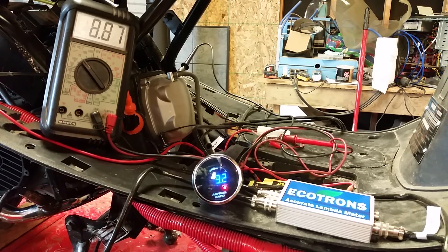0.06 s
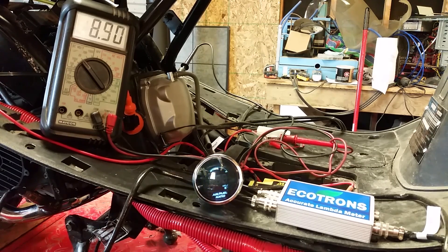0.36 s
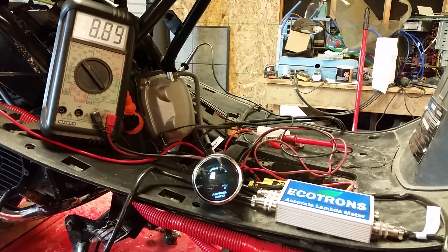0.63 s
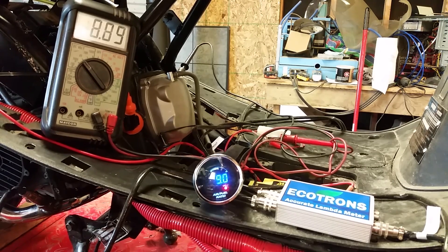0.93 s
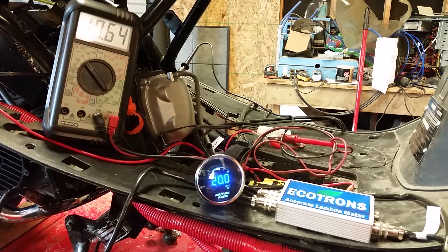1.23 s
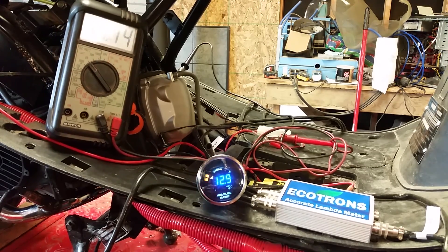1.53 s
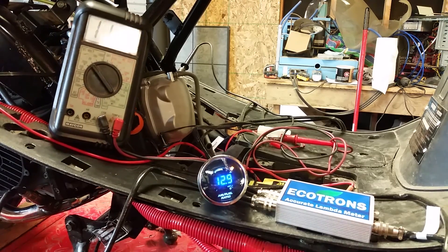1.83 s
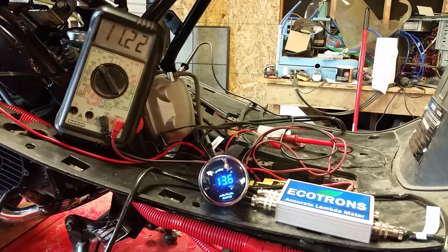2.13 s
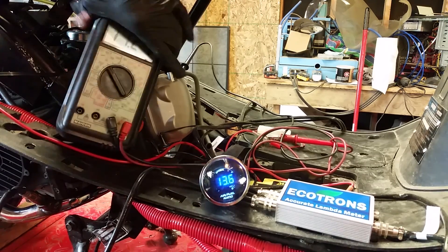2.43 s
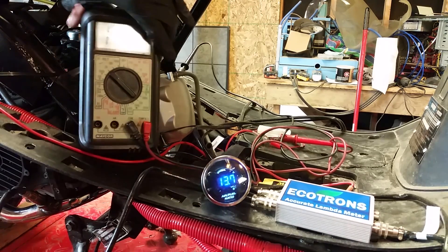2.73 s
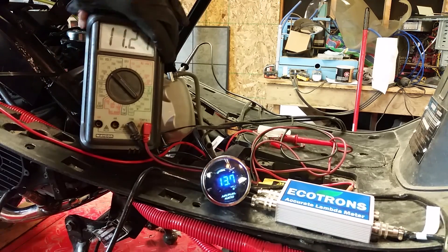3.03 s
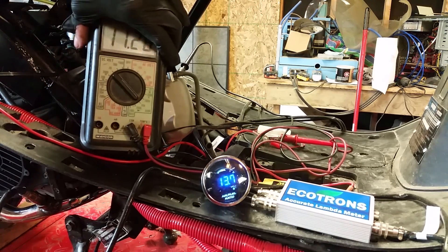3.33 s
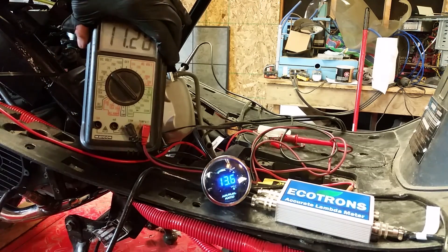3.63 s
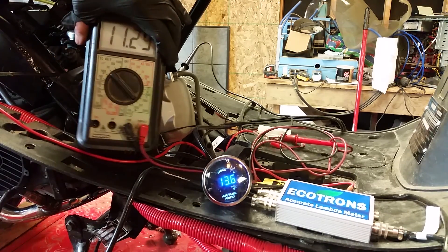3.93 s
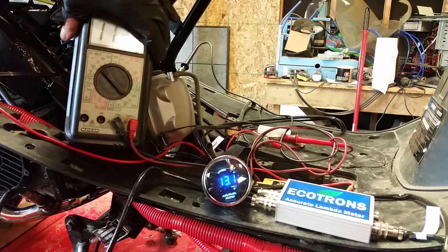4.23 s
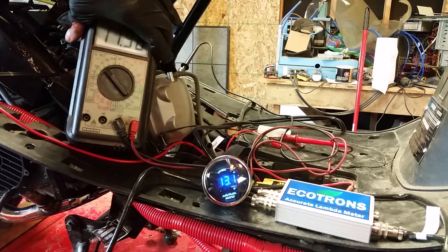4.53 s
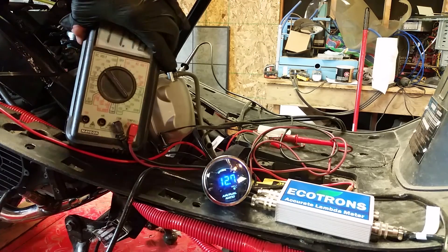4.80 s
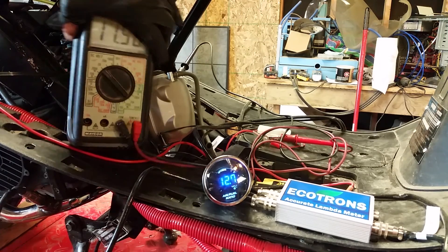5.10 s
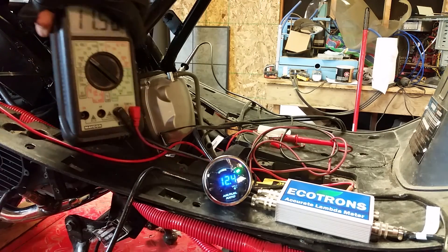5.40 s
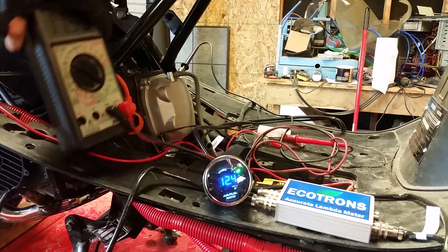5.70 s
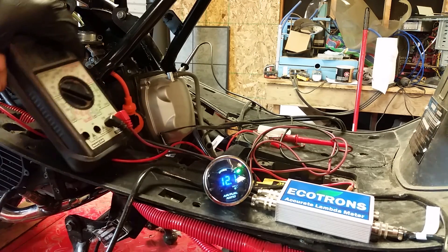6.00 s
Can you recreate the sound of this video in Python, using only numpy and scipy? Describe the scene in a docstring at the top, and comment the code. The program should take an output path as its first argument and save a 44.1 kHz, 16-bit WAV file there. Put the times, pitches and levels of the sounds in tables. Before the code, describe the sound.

From the very start, a scooter's electric starter grinds and whines, labouring through four quick compressions. Each brings a low chuff from the exhaust pipe and a metallic clack. At about 0.75 seconds the single-cylinder four-stroke engine catches with a low boom, and the starter dies away. A few rough, uneven barks follow until about 1 second. The engine then settles into a fast, throbbing idle: low exhaust and intake pulses, with a light knock and bright valve ticking in every cycle. The speed wavers slightly and creeps upward, with occasional harder beats, mostly between 1.6 and 3.1 seconds. A faint hum grows as the speed rises, and the engine is still running at the end, around 6 seconds. The sound is close, heard from just above the scooter's floorboard, in a workshop with short reverberation and a faint low rumble.

```python
"""A single-cylinder four-stroke scooter starts in a workshop, heard from just above its floorboard.
First the electric starter grinds and whines over four compressions, the pipe chuffing and the clutch
clacking at each. At 0.75 s the engine catches, and its first burns boom and rasp. It then settles into
a slowly rising idle: in every cycle the crankcase knocks, an exhaust pulse rings the silencer, the valve
train ticks and the intake gulps from the airbox, over a faint hum and the room's reverberation."""
import sys
import numpy as np
from scipy import signal
from scipy.fft import rfft, irfft, next_fast_len
from scipy.io import wavfile
from scipy.ndimage import uniform_filter1d, map_coordinates

SR = 44100
rng = np.random.default_rng(int(sys.argv[2]) if len(sys.argv) > 2 else 0)


def write(x):
    x = np.atleast_2d(x).T
    wavfile.write(sys.argv[1], SR, np.round(np.clip(x, -1, 1) * 32767).astype(np.int16))


N = 267246
CATCH_S, SETTLE_S = .749, .16


# Engine speed, hunting as it creeps up. Each row: time in seconds, firings per second.
SPEED = [(0.749, 13.86), (0.9, 15.739), (1.43, 16.904), (1.79, 16.101), (2.31, 17.04), (2.43, 15.964),
         (2.55, 16.897), (3.06, 16.477), (3.46, 17.832), (3.58, 17.457), (3.96, 17.639), (4.9, 19.287),
         (5.07, 17.851), (5.49, 19.601), (5.77, 19.734), (5.89, 18.97)]
def cycle_times(phase):
    """Phase is the integral of rate: the times at which the engine passes this fraction of its cycle."""
    t = clock()
    cycles = np.cumsum(curves(SPEED, t)[0]) / SR
    cycles -= np.interp(CATCH_S, t, cycles)
    return np.interp(np.arange(int(cycles[-1]) + 1) + phase, cycles, t)


# Silencer modes, and a higher barking one. Each row: frequency in Hz, width in Hz, gain in dB, polarity.
EXHAUST_MODES = [(138.44, 12, -1.5, -1), (145.6, 13, 1, 1), (190.3, 10.2, -10.5, -1),
                 (208.2, 7.2, -18.5, 1), (259.5, 25, -20.5, -1), (292, 8.5, -18.5, -1),
                 (342, 9.1, -24.5, -1), (373.4, 14, -25.5, -1), (423, 9.9, -44.5, -1)]
BARK_MODES = [(426, 36, -22, -1)]
def exhaust(phase=.054, bark_db_per_hz=5):
    """Impulse excitation: each exhaust pulse rings the silencer, which barks more as the speed rises."""
    times = cycle_times(phase)
    speed, = curves(SPEED, times)
    puffs = pulses(times, amp(.4 * rng.standard_normal(len(times))))
    barks = pulses(times, amp(bark_db_per_hz * (speed - speed.max())))
    return resonate(puffs, EXHAUST_MODES) + resonate(barks, BARK_MODES)


# Airbox modes. Each row: frequency in Hz, width in Hz, gain in dB, polarity.
AIRBOX_MODES = [(56, 26, -31, -1), (86, 37, -20.5, -1), (103.8, 10.5, -9.5, -1), (114.5, 11, -16.5, 1),
                (143.7, 26, -12.5, 1), (173, 120, -32, 1), (322.6, 43, -41, 1)]
def intake(level_db=-2.9, phase=.534, cutoff_hz=260):
    """Cavity resonance: half a cycle after the exhaust, a soft gulp of air rings the airbox."""
    times = cycle_times(phase)
    gulps = pulses(times, amp(.35 * rng.standard_normal(len(times))))
    return amp(level_db) * filtered(resonate(gulps, AIRBOX_MODES), lambda f: 1 / (1 + (f / cutoff_hz) ** 4))


# Gas flow through the running engine. Each row: time in seconds, level in dB.
GAS_FLOW = [(0.77, -21.5), (.84, -22.5), (0.92, -21), (1.11, -20), (1.17, -25.5), (1.77, -21.5),
            (3.28, -20.5), (3.62, -18), (5.04, -22), (5.1, -19), (5.47, -22), (5.72, -20), (5.88, -20.5)]
def gas_throb():
    """Exhaust and intake superpose; the flow sets their level, whichever harmonic meets a resonance."""
    throb = exhaust() + intake()
    power = abs(uniform_filter1d(uniform_filter1d(throb ** 2, size=SR // 8), size=SR // 16))
    return throb / np.sqrt(np.maximum(power, power.mean() / 2)) * amp(curves(GAS_FLOW, clock())[0])


# Firings that land harder. Each row: time in seconds, boost in dB.
HARD_FIRINGS = [(.75, 2), (1.619, 2), (1.68, 1.5), (1.803, 2.5), (1.987, 3.5), (2.286, 2), (2.345, 4),
                (2.405, 2), (2.53, 2.5), (2.588, 2), (2.707, 2), (2.827, 2), (2.886, 2.5), (2.946, 2.5),
                (3.007, 3), (3.128, 2), (3.418, 1.5), (3.757, 1.5), (3.815, 3), (4.265, 2.5), (4.484, 2),
                (5.012, 3), (5.904, 2.5)]
def firing_strength(times):
    """Cycle-to-cycle variation: blows within 15 ms of a hard firing gain in amplitude."""
    starts, db = np.transpose(HARD_FIRINGS)
    return amp((abs(times[:, None] - starts) < .015) @ db)


# Piston and valve-train impacts. Each row: cycle phase from 0 to 1, rise and decay in seconds,
# then levels in dB for casing, exhaust valve, intake valve and sharp tick.
CONTACTS = [(-.018, .002, .0026, -1.5, -14, -16, 1), (0.025, 0.002, 0.0027, -25, -6.5, -4.5, 14.5),
            (.11, 0.0031, 0.01, -5, -1, -11.5, 0), (.25, .002, 0.0027, -4, 4, -11, -9),
            (.31, .001, .0045, -4.5, 9.5, -8, -13), (.53, .002, 0.0027, -4, -5, 2.5, 6),
            (.58, 0.002, .008, -11.5, -12, 1, -3)]
def contact_forces(rub_db=(-19, -27, -27, -34), jitter_s=.0003, scatter_db=1.8):
    """Incoherent sources add in power: four envelopes of impacts over the rub of chain and fan."""
    t = np.arange(SR // 12) / SR
    power = np.zeros((4, N))
    for phase, rise, decay, *levels in CONTACTS:
        times = cycle_times(phase)
        late, strong = rng.standard_normal((len(times), 2)).T
        blows = pulses(times + jitter_s * late, firing_strength(times) ** 2 * amp(scatter_db * strong))
        shape = (1 - np.exp(-t / rise)) * np.exp(-t / decay)
        power += np.outer(amp(levels) ** 2, signal.fftconvolve(blows, (shape / shape.max()) ** 2)[:N])
    rub = np.outer(amp(rub_db), clock() > CATCH_S)
    return np.sqrt(abs(power) + rub ** 2)


def hardness(level_db=-25.5, db_per_flow_db=.43, catch_db=5):
    """Impact strength follows the gas flow, with a boost that relaxes exponentially after the catch."""
    flow_db, = curves(GAS_FLOW, clock())
    return amp(level_db + db_per_flow_db * (flow_db - flow_db.mean()) + catch_db * cold(clock()))


def cold(t):
    """Exponential relaxation from 1 at the catch towards 0 as the engine settles."""
    return np.exp(-np.maximum(t - CATCH_S, 0) / SETTLE_S)


# Impact spectra of casing, valves and ticks. Each row: frequency in Hz, spectral density in dB.
CASING_SPECTRUM = [(250, 9.5), (340, -6), (460, -1), (620, -4.5), (770, -2.5), (880, -6.5), (1100, -7.5),
                   (1300, -6.5), (1700, -8), (2100, -4), (2550, -4), (3000, -12), (4200, -10.5),
                   (5200, -15), (7500, -15.5), (16000, -19)]
VALVE_SPECTRUM = [(1000, -24), (3000, -19), (4200, -20.5), (4800, -22), (6500, -16.5), (7800, -15),
                  (8600, -8.5), (10200, -4), (11400, -2.5), (13000, -8), (14300, -15), (16000, -13)]
TICK_SPECTRUM = [(1000, -16), (3000, -18), (5000, -24.5), (6500, -8), (7800, -10.5), (9500, -2), (11000, 2),
                 (14000, 0), (15000, 5), (15800, -2)]
# Modes of each valve as it seats. Each row: frequency in Hz, width in Hz, gain in dB.
EXHAUST_VALVE_MODES = [(1650, 150, 6), (4340, 70, -2), (6620, 120, -7), (8700, 150, -10), (11250, 150, -12),
                       (11780, 90, -1), (12350, 300, -12)]
INTAKE_VALVE_MODES = [(2640, 200, 5), (3150, 200, 1), (3850, 120, 3), (4200, 120, -2), (6620, 110, -3),
                      (9500, 120, -9), (10212, 80, -1), (10600, 140, -5)]
def clatter(casing_db=-9, valve_db=-6.5, tick_db=-4.5, intake_db_per_hz=.65):
    """Impact noise: piston and valve train strike in every cycle, and each part rings in its own way."""
    casing, exhaust_valve, intake_valve, tick = contact_forces()
    speed, = curves(SPEED, clock())
    intake_valve *= amp(intake_db_per_hz * (speed - speed.mean()))
    sound = amp(casing_db) * metal(casing, CASING_SPECTRUM, ring_s=.05, ring_db=-12, grain=.26)
    for force, modes in (exhaust_valve, EXHAUST_VALVE_MODES), (intake_valve, INTAKE_VALVE_MODES):
        valve = metal(force, VALVE_SPECTRUM, ring_s=.04, ring_db=-13, grain=.15, modes=modes)
        sound += amp(valve_db) * valve
    sound += amp(tick_db) * metal(tick, TICK_SPECTRUM, ring_s=.029, ring_db=-22, grain=.11)
    return sound * hardness()


# Crankcase modes. Each row: frequency in Hz, width in Hz, gain in dB.
CRANKCASE_MODES = [(415.8, 22.5, 6.5), (762, 31, 1), (985, 31, -1.5), (1315, 120, -6), (1660, 56, -5),
                   (2370, 150, -5), (2570, 110, -6)]
def knock(level_db=-15, phase=-.012, cold_db=2, oil_cutoff_hz=3200, stagger_s=.002983):
    """Modal response: each firing knocks the crankcase through an oil film; its modes answer in turn."""
    times = cycle_times(phase)
    blows = pulses(times, amp(cold_db * cold(times) - .06 * rng.standard_normal(len(times))))
    lags = stagger_s * np.linspace(1, 0, len(CRANKCASE_MODES))

    def response(f):
        case = sum(np.exp(-2j * np.pi * f * lag) * resonance(f, *mode)
                   for lag, mode in zip(lags, CRANKCASE_MODES))
        return case / (1 + (f / oil_cutoff_hz) ** 6) * balance(f)
    return amp(level_db) * hardness() * unit(from_left(filtered(blows, response), lead_s=.0002))


# Late burns at the catch. Each row: start in seconds, level in dB.
LATE_BURNS = [(.768, 2), (0.841, -8)]
# The silencer modes they ring. Each row: frequency in Hz, width in Hz, gain in dB, polarity.
BOOM_MODES = [(135, 18, 4.5, 1), (158, 16, 1, -1)]
def booms(gain_db=42):
    """Cavity resonance: the first rich charges burn late and boom in the silencer."""
    starts, db = np.transpose(LATE_BURNS)
    return resonate(pulses(starts, amp(gain_db + db)), BOOM_MODES)


# The first uneven burns. Each row: start in seconds, level in dB.
RASPS = [(.75, 0), (.768, 1), (.826, -7), (.884, -1), (.949, -10), (1.012, -9)]
# Their spectrum. Each row: frequency in Hz, spectral density in dB.
RASP_SPECTRUM = [(120, -27), (260, 2), (450, 4), (650, -10.5), (950, -10), (1500, -28), (3000, -32),
                 (8000, -58)]
def rasps(level_db=-27.5, attack_s=.0013, decay_s=.015):
    """Amplitude-modulated noise: uneven burns tear through the pipe as short rough barks."""
    bursts = np.zeros(N)
    for start, db in RASPS:
        age = np.maximum(clock() - start, 0)
        bursts += amp(db) * (1 - np.exp(-age / attack_s)) * np.exp(-age / decay_s)
    rough = rng.standard_normal((2, N)) * np.exp(.84 * wobble(700))
    return amp(level_db) * bursts * spread(rough, RASP_SPECTRUM)


# Piston strokes under the starter. Each row: start in seconds, level in dB.
STROKES = [(-.04, -16.5), (.167, -15.5), (.367, -16), (0.565, -16)]
# Modes of the cold pipe. Each row: frequency in Hz, width in Hz, gain in dB, polarity.
PIPE_MODES = [(50.4, 33, 5.5, 1), (71, 24, -25, -1), (101, 3.2, 8.5, 1), (140.3, 11, 6.5, -1),
              (189, 11, 2, 1), (268, 78, -45, -1), (379, 30, -11.5, 1)]
def chuffs(gain_db=43, gap_s=.0127):
    """Air-column resonance: before the engine fires, each stroke pumps a double puff through the pipe."""
    starts, db = np.transpose(STROKES)
    faded_db = 60 * np.minimum(starts, 0)  # a stroke begun before time zero has partly died away
    first = pulses(np.maximum(starts, 0), amp(db + gain_db - 1 + faded_db))
    second = pulses(starts + gap_s, amp(db + gain_db))
    return resonate(first + second, PIPE_MODES)


# Load surges after a stroke. Each row: delay, attack, hold and release in seconds, grind and hiss in dB.
SURGES = [(.038, .012, .044, .024, 0, .7), (.12, .011, .016, .024, 1, .7),
          (.182, .008, .014, .009, -13, .3)]
# The starter's speed. Each row: time since the stroke in seconds, shaft tone in Hz.
SHAFT_TONE = [(0, 545), (.022, 550), (.045, 592), (.062, 572), (.095, 530), (.125, 528), (.15, 490),
              (.175, 520), (.2, 545)]
def starter_load(free_grind_db=-9, free_hiss_db=-10):
    """Periodic loading: grind gain, hiss gain and shaft tone as the motor labours at each compression."""
    t = clock()
    starts = np.transpose(STROKES)[0]
    power = np.outer(amp([free_grind_db, free_hiss_db]) ** 2, np.ones(N))
    for start in starts:
        for delay, attack, hold, release, *levels in SURGES:
            age = t[:SR] - start - delay
            swell = np.clip(age / attack, 0, 1) * np.exp(-np.maximum(age - attack - hold, 0) / release)
            power[:, :SR] += np.outer(amp(levels), swell) ** 2
    grind, hiss = np.sqrt(power)
    since_stroke = t - starts[np.maximum(np.searchsorted(starts, t) - 1, 0)]
    return grind, hiss, uniform_filter1d(curves(SHAFT_TONE, since_stroke)[0], size=SR // 100)


def engaged(stop_s=.726, coast_s=.021):
    """Exponential decay: the starter drives until the engine outruns it, then its sound dies away."""
    return np.exp(-np.maximum(clock() - stop_s, 0) / coast_s)


# Spectra of the gears and the brushes. Each row: frequency in Hz, spectral density in dB.
GEAR_SPECTRUM = [(260, -41), (450, -25), (573, -3), (662, -20), (800, -8.5), (1060, -12.5), (1250, -3),
                 (1430, -9), (1590, -4), (1840, -6.5), (2500, -4.5), (3170, -6.5), (3750, -11.5),
                 (4250, -8), (4820, -7.5), (5710, -20), (8000, -17), (10400, -29), (17600, -120)]
BRUSH_SPECTRUM = [(3820, -35), (5300, -21.5), (6500, -9), (7500, -17.5), (8720, -9), (9400, -5), (9850, 2),
                  (10400, -2), (11800, -2.5), (13900, -6.5), (15800, -8)]
def starter(grind_db=-32, brush_db=-30.5, whine_db=-27.5, tooth_depth=.18):
    """Friction noise: gears grind and brushes hiss, modulated at the shaft tone, beside the whine."""
    grind, hiss, tone_hz = starter_load()
    teeth = engaged() * (1 + tooth_depth * np.sin(2 * np.pi * np.cumsum(tone_hz) / SR))
    gears = metal(grind * teeth, GEAR_SPECTRUM, ring_s=.07, ring_db=-3, grain=.25)
    brushes = metal(hiss * teeth, BRUSH_SPECTRUM, ring_s=.05, ring_db=-4, grain=.15)
    return amp(grind_db) * gears + amp(brush_db) * brushes + amp(whine_db) * whine()


# Gear tones; every third order belongs to the mesh. Each row: multiple of the shaft tone, level in dB.
GEAR_ORDERS = [(1, -6), (2, -10), (3, -1), (6, -2), (9, -2), (12, -14), (18, -8), (21, -10)]
# Modes of the gear housing. Each row: frequency in Hz, width in Hz, gain in dB.
HOUSING_MODES = [(580, 25, -3), (1045, 35, -3), (1580, 25, -1), (1715, 20, 0), (3235, 35, 3),
                 (4750, 60, -1), (5085, 50, -2)]
def whine(direct_db=-8, flutter_rad=.2):
    """Forced vibration: gear tones swoop with the speed and flare in each housing mode that they cross."""
    grind, _, tone_hz = starter_load()
    turns = np.cumsum(tone_hz * (1 + .006 * wobble(25))) / SR
    tones = np.zeros((2, N))
    for order, db in GEAR_ORDERS:
        angle = 2 * np.pi * order * turns + flutter_rad * wobble(300)
        tones += amp(db) * np.sin(angle + rng.uniform(0, 2 * np.pi, (2, 1)))
    housing = lambda f: amp(direct_db) + sum(resonance(f, *mode) for mode in HOUSING_MODES)
    return filtered(tones * grind * engaged(), housing)


# Blows on the starter's one-way clutch. Each row: start in seconds, level in dB.
CLACKS = [(.116, 1.5), (.318, 4.5), (.519, 4.5), (0.716, -1)]
# Its modes. Each row: frequency in Hz, level in dB, time to fall 60 dB in seconds.
CLUTCH_MODES = [(1100, -6, .03), (1215, -3, .08), (1262, 1, .07), (1322, -2.5, .07), (1420, -6, .03),
                (2550, -10, .05)]
def clutch(level_db=-18.5, attack_s=.0022):
    """Beating of close modes: the clutch is struck as the load flips at the top of each compression."""
    out = np.zeros((2, N))
    for start, db in CLACKS:
        age = np.maximum(clock() - start, 0)[:SR]
        onset = 1 - np.exp(-age / attack_s)
        channel_phase = np.array([[0], [np.pi / 2]]) + rng.uniform(0, 2 * np.pi)
        for hz, mode_db, t60 in CLUTCH_MODES:
            ring = np.sin(2 * np.pi * hz * (age - 2 * attack_s) + channel_phase)
            out[:, :SR] += amp(level_db + db + mode_db - 60 * age / t60) * onset * ring
    return out


# Tones of the rotating parts. Each row: multiple of the firing rate, level in dB.
HUM_ORDERS = [(14, 0), (16, -3), (18, 0), (22, -2), (24, -6), (42, -11)]
def hum(level_db=-38, db_per_hz=3):
    """Rotational harmonics: crank, fan and alternator hum in tones that climb and swell with speed."""
    speed, = curves(SPEED, clock())
    cycles = np.cumsum(speed) / SR
    tones = np.zeros((2, N))
    for order, db in HUM_ORDERS:
        angle = 2 * np.pi * (order * cycles + rng.uniform())
        tones += amp(db) * np.sin(angle + .5 * rng.standard_normal((2, 1)))
    return amp(level_db + db_per_hz * (speed - speed.max())) * tones


# The workshop's decay. Each row: frequency in Hz, reverberation time in seconds.
ROOM_T60 = [(200, 0.31), (2000, 0.38), (12000, 0.07)]
def workshop(x):
    """Reverberation: convolution with a noise tail in which each frequency dies at its own rate."""
    hz, t, bands = signal.stft(rng.standard_normal((2, SR // 2)), SR, nperseg=256)
    tail = signal.istft(bands * amp(-60 * t / along(ROOM_T60, hz)[:, None]), SR, nperseg=256)[1]
    return signal.fftconvolve(x, tail / np.linalg.norm(tail[0]), axes=1)[:, :N]


def rumble(level_db=-34):
    """Ambient noise: the room's faint, steady rumble, strongest in the bass."""
    spectrum = [(20, 1), (60, -1), (150, 4), (400, -12), (2000, -29), (16000, -45)]  # Hz, dB
    return amp(level_db) * spread(rng.standard_normal((2, N)), spectrum)


def metal(force, spectrum, ring_s, ring_db, grain, modes=()):
    """Contact noise under a force envelope excites a dense field of modes, and any strong ones given."""
    t = np.arange(SR // 8) / SR
    tail = rng.standard_normal((2, len(t))) * amp(-60 * t / ring_s)
    grit = force * rng.standard_normal((2, N)) * np.exp(grain * wobble(1500))
    ring = signal.fftconvolve(grit[:1] + grit[1:], tail, axes=1)[:, :N]
    sound = unit(grit) + amp(ring_db) * unit(ring)
    if len(modes):
        sound = filtered(sound, lambda f: 1 + 2 * sum(resonance(f, *mode) for mode in modes))
    return spread(sound, spectrum)


def resonate(x, modes, soft_hz=480):
    """Modal superposition: soft-edged gas pulses ring a cavity that radiates neither rumble nor treble."""
    cavity = lambda f: sum(np.sign(polarity) * resonance(f, *mode) for *mode, polarity in modes)
    radiation = signal.butter(2, [40, 650], 'band', fs=SR, output='sos')
    return signal.sosfilt(radiation, filtered(x, lambda f: cavity(f) / (1 + (f / soft_hz) ** 8)))


def resonance(f, centre_hz, width_hz, db):
    """Frequency response of a damped harmonic oscillator."""
    return amp(db) * 1j * f * width_hz / (centre_hz ** 2 - f * f + 1j * f * width_hz)


# Stereo balance. Each row: frequency in Hz, left minus right level in dB.
BALANCE = [(60, 15), (110, -14.5), (200, 4), (380, -3.5), (700, 3.5), (1290, 1.5), (2380, 1), (4400, -5.5),
           (8120, 3.5), (15000, 0)]
def balance(hz):
    """Level difference between the channels, as a left and a right gain."""
    return amp(np.outer([.5, -.5], along(BALANCE, hz)))


# Likeness of left and right. Each row: frequency in Hz, correlation from 0 to 1.
COHERENCE = [(100, 0.99), (300, 0.35), (600, 0.38), (1200, 0), (3000, 0), (15000, 0)]
def spread(pair, spectrum):
    """Partial coherence: two unrelated signals are coloured and cross-mixed into stereo at rms 1."""
    angle = lambda hz: np.arcsin(np.clip(along(COHERENCE, hz), -1, 1)) / 2
    colour = lambda hz: amp(along(spectrum, hz)) * balance(hz) * hz / np.hypot(hz, 200)
    own = filtered(pair, lambda hz: colour(hz) * np.cos(angle(hz)))
    crossed = filtered(pair[::-1], lambda hz: colour(hz) * np.sin(angle(hz)))
    return unit(own + crossed)


def from_left(x, lead_s):
    """Arrival-time difference: the sound reaches the left channel sooner."""
    return filtered(x, lambda hz: np.exp(1j * np.pi * np.outer([1, -1], hz) * lead_s))


def filtered(x, response):
    """Linear filtering: the spectrum of x times a complex response."""
    size = next_fast_len(N + SR // 2)
    return irfft(rfft(x, size) * response(np.fft.rfftfreq(size, 1 / SR)), size)[..., :N]


def pulses(times, sizes):
    """A train of impulses."""
    inside = (times >= 0) & (times < (N - 1) / SR)
    return np.bincount((times[inside] * SR).astype(int), sizes[inside], N)


def wobble(rate):
    """A smooth random curve, rate knots a second."""
    return map_coordinates(rng.standard_normal(int(N * rate / SR) + 4), [clock() * rate])


def curves(rows, at):
    """Linear interpolation of each later column against the first."""
    times, *columns = np.transpose(rows)
    return [np.interp(at, times, column) for column in columns]


def along(points, hz):
    """Interpolation on a logarithmic frequency axis."""
    freqs, values = np.transpose(points)
    return np.interp(np.log(hz + 1), np.log(freqs + 1), values)


def amp(db):
    """Decibels to gain."""
    return 10 ** (np.asarray(db) / 20)


def unit(x):
    """Scale to rms 1."""
    return x / np.sqrt(np.mean(x ** 2) + 1e-20)


def clock():
    """Time of each sample in seconds."""
    return np.arange(N) / SR


def scene():
    """Superposition of machine noise, low gas pulses near the middle, their reverberation and rumble."""
    machine = starter() + clutch() + clatter() + knock() + rasps()
    gas = from_left(gas_throb() + chuffs() + booms(), lead_s=.00011) * amp([[-.3], [.3]])
    background = rumble()
    gas_above_bass = filtered(gas, lambda hz: hz ** 4 / (hz ** 4 + 230 ** 4))
    reverberation = amp(-17) * workshop(gas_above_bass) + amp(-9.5) * workshop(machine)
    return machine + gas + hum() + reverberation + background


def record(dry, top_hz=15820):
    """Band limiting: an ideal low-pass filter removes the highest treble."""
    return filtered(dry, lambda hz: hz < top_hz)


dry = scene()
out = record(dry)
write(out)
```